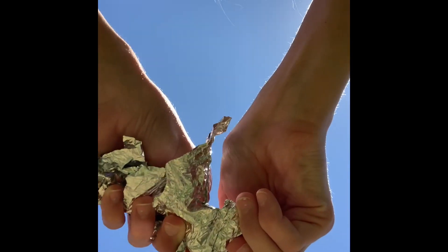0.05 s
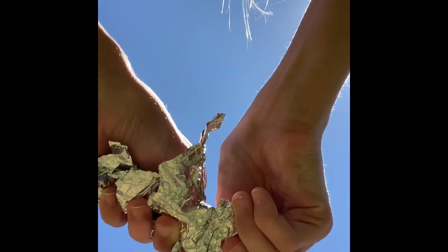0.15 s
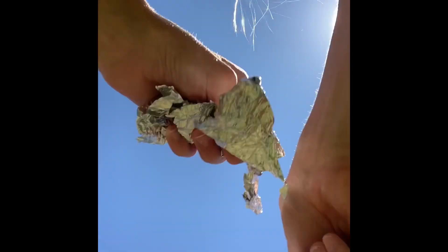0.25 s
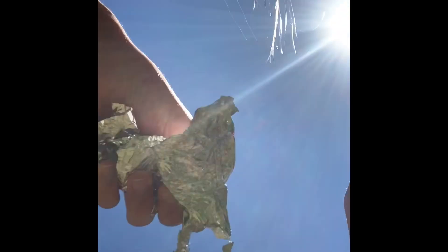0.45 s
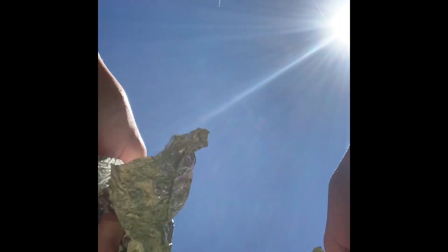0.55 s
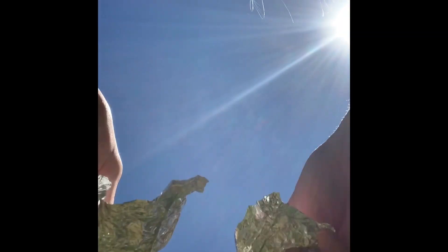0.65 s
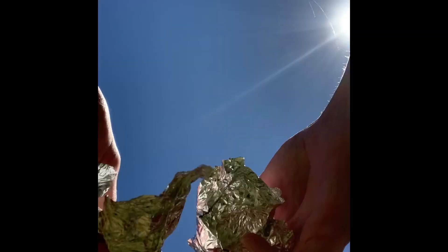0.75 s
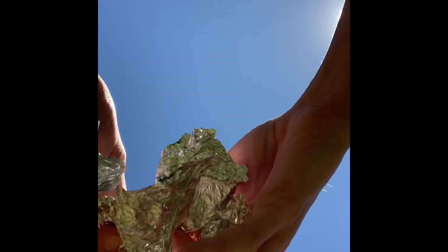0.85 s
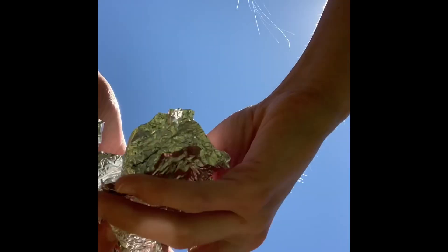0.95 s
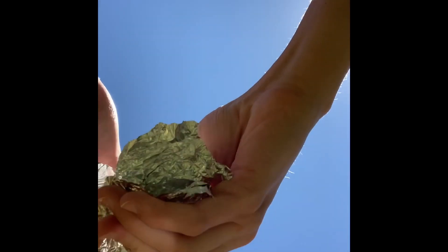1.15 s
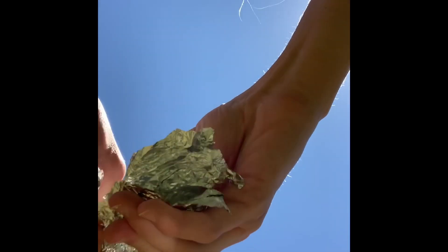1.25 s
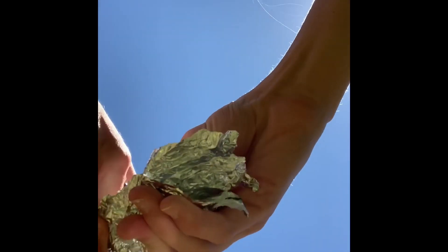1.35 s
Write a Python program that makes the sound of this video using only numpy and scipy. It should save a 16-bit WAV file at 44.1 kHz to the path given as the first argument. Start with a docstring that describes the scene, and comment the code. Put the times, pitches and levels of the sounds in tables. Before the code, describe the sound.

A foil sheet is ripped once by hand outdoors, then air buffets and faint crinkling follows.

```python
"""Outdoors, over a low rumble, a crinkled foil sheet stirs close to the microphone. At 0.21 s it is
ripped by hand: a tenth of a second of tiny fractures ends in a few hard snaps as the last strip parts.
Air buffets the microphone until 0.6 s while the hands fly apart, with low handling thumps.
Then the loose pieces tick, ring and rustle faintly."""
import sys
import numpy as np
from scipy import signal
from scipy.fft import rfft, irfft, next_fast_len
from scipy.io import wavfile

SR = 44100
rng = np.random.default_rng(int(sys.argv[2]) if len(sys.argv) > 2 else 0)


def bounce(signal):
    """Save signal as a 16-bit WAV file at the path given by the first command-line argument."""
    frames = np.transpose(np.atleast_2d(signal))
    limited = np.clip(frames, -1, 1)
    pcm = np.round(limited * 32767).astype(np.int16)
    wavfile.write(sys.argv[1], SR, pcm)


N = 61739

# resonances of the sheet's body: freq_hz, gain_db
BODY_COLOUR = [(120, -18), (350, -13), (500, -2), (680, -5.5), (900, 1), (1450, -2.5), (1850, -2.5),
               (2150, -24), (2600, -11), (3200, -20.5), (6000, -47.5), (10000, -100)]
# resonances of its bright edge: freq_hz, gain_db
EDGE_COLOUR = [(1500, -23), (2400, -2), (3150, -8.5), (3700, 1), (4250, 1), (4900, -13), (5900, -16.5),
               (6600, -28.5), (8200, -49.5), (9000, -58), (14000, -59)]
BODY_WIDTH, EDGE_WIDTH, LOOSE_WIDTH = .38, .68, .62  # side / mid
EDGE_PAN_DB = -3.5


def amp(db):
    """Decibels to gain."""
    return 10 ** (np.asarray(db) / 20)


def unit(x):
    """Scale to rms 1."""
    return x / np.sqrt(np.mean(x ** 2) + 1e-20)


def along(points, hz):
    """Read (freq_hz, value) points on a log axis."""
    freq_hz, values = np.transpose(points)
    return np.interp(np.log(hz + 1), np.log(freq_hz + 1), values)


def curves(rows):
    """One value per sample for each column after time_s."""
    time_s, *columns = np.transpose(rows)
    return [np.interp(np.arange(N) / SR, time_s, column) for column in columns]


def filtered(x, response):
    """Apply a frequency response."""
    size = next_fast_len(N + SR // 2)
    hz = np.fft.rfftfreq(size, 1 / SR)
    return irfft(rfft(x, size) * response(hz), size)[..., :N]


def ring(x, colour, size=2048):
    """Minimum-phase filter with a (freq_hz, gain_db) colour."""
    gain = amp(along(colour, np.fft.rfftfreq(size, 1 / SR)))
    cepstrum = irfft(np.log(gain))
    cepstrum[1:size // 2] *= 2
    cepstrum[size // 2 + 1:] = 0
    impulse = irfft(np.exp(rfft(cepstrum)))
    return signal.fftconvolve(x, impulse[None], axes=1)[:, :x.shape[1]]


def pan(db):
    """Stereo gains; positive is left."""
    return amp([[db / 2], [-db / 2]])


def lead(x, lead_s):
    """Left channel arrives lead_s before the right."""
    return filtered(x, lambda hz: np.exp(1j * np.pi * hz * lead_s * np.array([[1], [-1]])))


def spread(mid_side, width):
    """Mid and side to left and right."""
    mid, side = mid_side
    return np.array([mid + width * side, mid - width * side])


def add(out, start_s, x):
    """Mix x into out at start_s."""
    part = out[:, round(start_s * SR):][:, :x.shape[1]]
    part += x[:, :part.shape[1]]


def air(colour, correlation):
    """Stereo noise, rms 1, with left-right correlation set per frequency."""
    def response(hz):
        angle = np.arccos(np.clip(along(correlation, hz), -1, 1)) / 2
        return amp(along(colour, hz)) * [np.cos(angle), np.sin(angle)]
    mid_side = filtered(rng.standard_normal((2, N)), response)
    return unit(spread(mid_side, width=1))


def crackle(colour, width, rate_per_s, spread_db):
    """Tiny uneven clicks, each from its own direction, ring the foil; rms 1."""
    size_db = spread_db * np.minimum(rng.exponential(size=N), 4)
    polarity = rng.choice([-1, 1], N)
    clicks = amp(size_db) * polarity * (rng.random(N) < rate_per_s / SR)
    side = clicks * rng.standard_normal(N)
    return unit(ring(spread([clicks, side], width), colour))


def pop(colour, width, t60_s):
    """Short burst of foil noise, peak about 1."""
    t = np.arange(SR // 16) / SR
    decay = amp(-60 * t / t60_s)
    noise = spread(rng.standard_normal((2, len(t))), width)
    burst = ring(noise * decay, colour)
    onset_rms = np.sqrt(np.sum(burst.mean(0) ** 2) / np.sum(decay ** 2))
    return burst / (2 * onset_rms)


def outdoors():
    """Quiet low rumble with a trace of hiss."""
    # background spectrum: freq_hz, gain_db
    colour = [(15, -6.5), (35, 1.5), (58, 4), (85, -7), (160, -12.5), (250, -16), (350, -21.5), (520, -19),
              (750, -27), (1400, -34), (2200, -33), (4400, -40), (6000, -39.5), (7200, -47.5),
              (9000, -42.5), (12500, -45), (14300, -58)]
    # background envelope: time_s, level_db
    levels = [(0, -69.5), (.17, -66.5), (.7, -66.5), (.85, -65), (1.4, -68)]
    # left-right likeness: freq_hz, correlation
    correlation = [(60, .99), (300, .93), (600, .75), (2000, .45), (6000, .25), (7500, -.5), (9000, -.9),
                   (12500, -.1)]
    level_db, = curves(levels)
    return amp(level_db) * air(colour, correlation)


def buffet():
    """Moving air rumbles and rushes on the microphone."""
    # gust envelope: time_s, deep_db, rush_db
    levels = [(.205, -81, -90), (.228, -47.5, -46.5), (.25, -42.5, -47.5), (.3, -36, -40.5),
              (.342, -41, -41.5), (.375, -44, -43), (.42, -38, -43), (.47, -44, -42.5), (.51, -42, -42.5),
              (.55, -42, -42.5), (.567, -44, -38.5), (.578, -42, -62.5), (.592, -65, -88.5),
              (.65, -64, -86), (.68, -82.5, -100)]
    # deep rumble spectrum: freq_hz, gain_db
    deep_colour = [(15, -14), (35, -6), (60, 1.5), (95, -1), (140, -7.5), (250, -20), (600, -90.5)]
    # rush spectrum: freq_hz, gain_db
    rush_colour = [(60, -22.5), (130, -5.5), (190, 0), (270, -0.5), (400, -8.5), (580, -10), (800, -17.5),
                   (1300, -24.5), (2200, -41), (5000, -81)]
    # left-right likeness: freq_hz, correlation
    correlation = [(30, .995), (100, .996), (350, .96), (700, .8), (1500, .6)]
    deep_db, rush_db = curves(levels)
    return amp(deep_db) * air(deep_colour, correlation) + amp(rush_db) * air(rush_colour, correlation)


def handling_thumps():
    """Each thump is one low damped mode."""
    # thumps: start_s, pitch_hz, peak_db
    thumps = [(0.148, 55, -65), (0.181, 190, -62), (0.34, 63.7, -32.5), (0.396, 64.3, -32.5),
              (.561, 165.6, -31.5), (0.617, 57.7, -52), (0.789, 54.95, -56), (0.88, 256, -62.5),
              (1.232, 154, -64)]
    t60_s, attack_s = .044, .0027
    out, t = np.zeros((2, N)), np.arange(SR // 4) / SR
    envelope = amp(-60 * t / t60_s) * (1 - np.exp(-t / attack_s))
    for start_s, pitch_hz, peak_db in thumps:
        mode = np.sin(2 * np.pi * pitch_hz * t) * envelope
        add(out, start_s, amp(peak_db) * mode[None] / np.abs(mode).max())
    return out


def flap_tinks():
    """Small foil flaps shiver in a narrow band around their pitch."""
    # tinny rings: start_s, pitch_hz, peak_db
    tinks = [(0.68, 5700, -65), (.757, 6030, -72.5), (0.8231, 5800, -64.5), (0.944, 5020, -64),
             (.984, 5660, -67.5)]
    skirt_db = -20.5
    out = np.zeros((2, N))
    for start_s, pitch_hz, peak_db in tinks:
        band = [(pitch_hz / 2, 2 * skirt_db), (pitch_hz * .88, skirt_db), (pitch_hz, 0),
                (pitch_hz * 1.2, skirt_db), (pitch_hz * 2, 2 * skirt_db)]
        add(out, start_s, amp(peak_db) * pop(band, LOOSE_WIDTH, t60_s=.019))
    return out


def loose_pieces():
    """The foil crinkles dully while swinging, brighter at rest in the hands; single creases pop."""
    # rustle envelope: time_s, level_db
    levels = [(0, -84), (.12, -90.5), (.21, -84), (.33, -57), (.385, -71.5), (.41, -63), (.445, -77),
              (.49, -63.5), (.565, -70.5), (.59, -84), (.685, -79.5), (.775, -94), (.81, -86), (.91, -85.5),
              (.965, -80), (1.02, -81.5), (1.13, -87.5), (1.4, -83.5)]
    # crease pops: start_s, peak_db, pan_db
    ticks = [(.064, -63, 0), (0.108, -60.5, 2), (0.142, -64.5, 1), (0.356, -51, 8.5), (.367, -51, -6),
             (0.4048, -44.5, 2), (0.4167, -42, -0.5), (0.464, -40, 0), (0.478, -49, 6), (0.496, -43, 3),
             (.513, -73, 11), (0.5208, -66, -3), (.679, -63, -1), (.7135, -60, -1), (0.797, -59, 0.5),
             (0.9627, -57, -1.5), (1.0496, -60, 2), (1.0657, -61, -4), (1.1916, -65.5, 3),
             (1.225, -65.5, 0), (1.336, -62.5, 2)]
    # swinging foil spectrum: freq_hz, gain_db
    swing_colour = [(500, -10.5), (1400, 2.5), (2200, 1.5), (3200, 1), (4500, 1), (5400, -11),
                    (6300, -23.5), (8000, -38.5), (12000, -62)]
    # resting foil spectrum: freq_hz, gain_db
    rest_colour = [(500, -11), (1400, 7), (2200, -3.5), (3200, 3), (4400, -2.5), (6200, 0.5), (7200, -11),
                   (9000, -32), (12000, -48)]
    rip_start_s, settled_s = .214, .585
    swings = lambda time_s: (time_s > rip_start_s) & (time_s < settled_s)
    level_db, = curves(levels)
    swinging = crackle(swing_colour, LOOSE_WIDTH, rate_per_s=3300, spread_db=2.8)
    resting = crackle(rest_colour, LOOSE_WIDTH, rate_per_s=3300, spread_db=2.8)
    out = amp(level_db) * np.where(swings(np.arange(N) / SR), swinging, resting)
    for start_s, peak_db, pan_db in ticks:
        colour = swing_colour if swings(start_s) else rest_colour
        add(out, start_s, amp(peak_db) * pan(pan_db) * pop(colour, LOOSE_WIDTH, t60_s=.011))
    return out


def snaps():
    """Tough folds give way: the taut sheet swings a few cycles, cracks and shivers briefly."""
    # breaking folds: start_s, body_db, edge_db, pitch_hz
    folds = [(.2366, -44, -28, 1400), (.2524, -28, -36, 1400), (.2555, -25.5, -42, 1300),
             (.2598, -28, -26, 1500), (.2722, -34, -22.5, 1400), (.2808, -26, -26, 1400),
             (.2954, -10.7, -21, 1350), (.2993, -21, -31, 1100), (.3051, -15.5, -23, 1480),
             (.3132, -21.5, -38, 1450)]
    t60_s, attack_s, shiver_db = .0052, .0005, -13
    out, t = np.zeros((2, N)), np.arange(SR // 16) / SR
    envelope = amp(-60 * t / t60_s) * (1 - np.exp(-t / attack_s)) ** 2
    for start_s, body_db, edge_db, pitch_hz in folds:
        swing = -np.sin(2 * np.pi * pitch_hz * t) * envelope
        shiver = amp(shiver_db) * pop(BODY_COLOUR, BODY_WIDTH, t60_s=.028)
        body = (swing / np.abs(swing).max() + shiver) * pan(db=-1.5)
        edge = pop(EDGE_COLOUR, EDGE_WIDTH, t60_s=.012) * pan(EDGE_PAN_DB)
        add(out, start_s, amp(body_db) * body + amp(edge_db) * edge)
    return lead(out, lead_s=30e-6)


def rip():
    """Running tear: fractures ring the sheet's body and its bright edge."""
    # tear envelope: time_s, body_db, edge_db
    levels = [(.214, -88.5, -98.5), (.222, -56, -63), (.232, -50, -55), (.246, -38, -46), (.257, -30, -41),
              (.263, -33, -34.5), (.268, -37, -40), (.274, -34, -40), (.287, -30.5, -42.5),
              (.298, -31, -39.5), (.308, -30, -38), (.317, -38, -51.5), (.326, -50, -63), (.338, -89, -96)]
    body_db, edge_db = curves(levels)
    body = crackle(BODY_COLOUR, BODY_WIDTH, rate_per_s=3100, spread_db=2.5)
    edge = crackle(EDGE_COLOUR, EDGE_WIDTH, rate_per_s=3100, spread_db=2.5)
    return amp(body_db) * body + amp(edge_db) * edge * pan(EDGE_PAN_DB)


def scene():
    """Foil, hands and moving air over the outdoor rumble."""
    foil = rip() + snaps() + loose_pieces() + flap_tinks()
    return lead(foil, lead_s=25e-6) + handling_thumps() + buffet() + outdoors()


def record(dry):
    """Brick-wall low-pass."""
    return filtered(dry, lambda hz: hz < 14300)


dry = scene()
out = record(dry)
bounce(out)
```